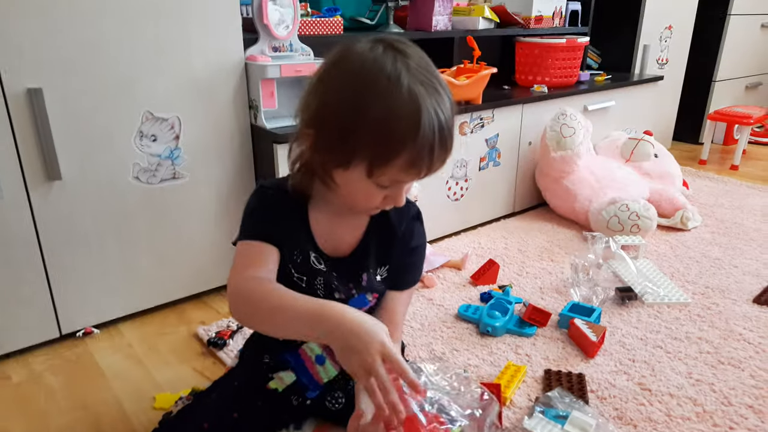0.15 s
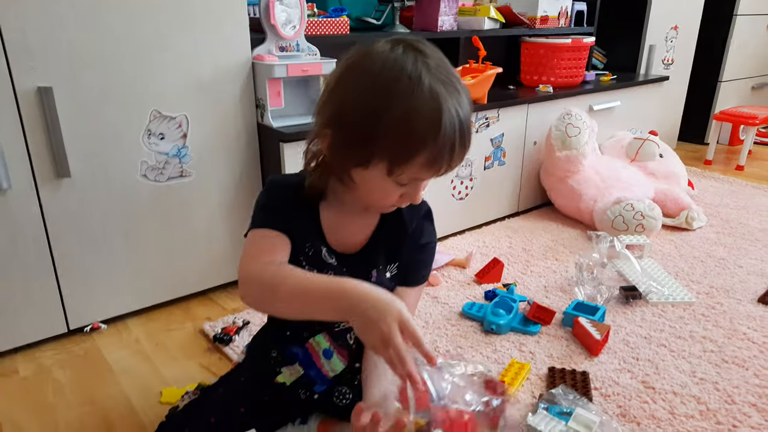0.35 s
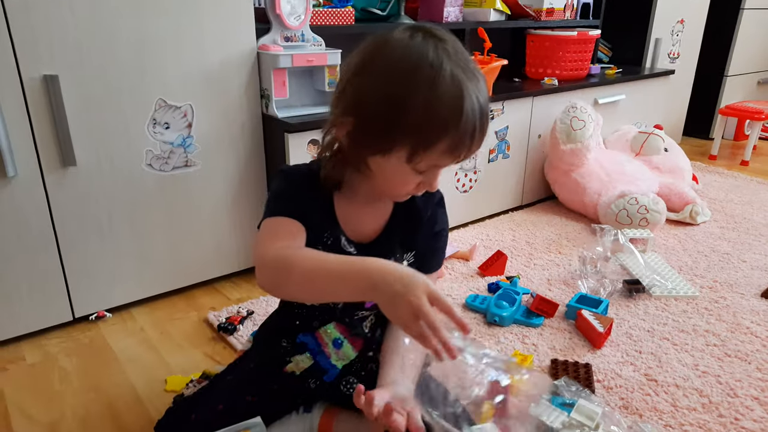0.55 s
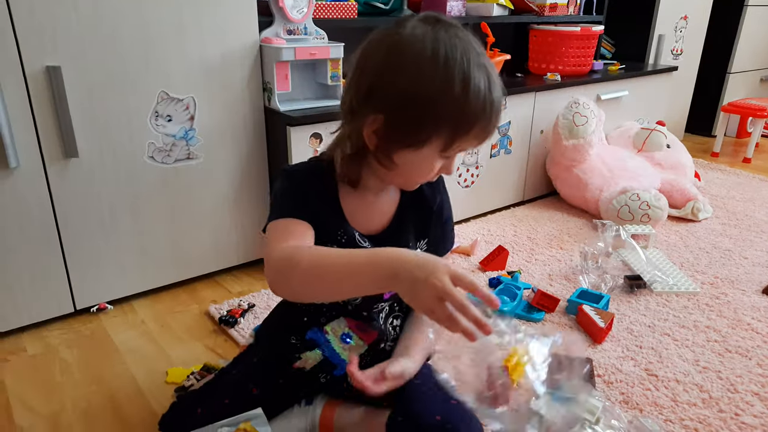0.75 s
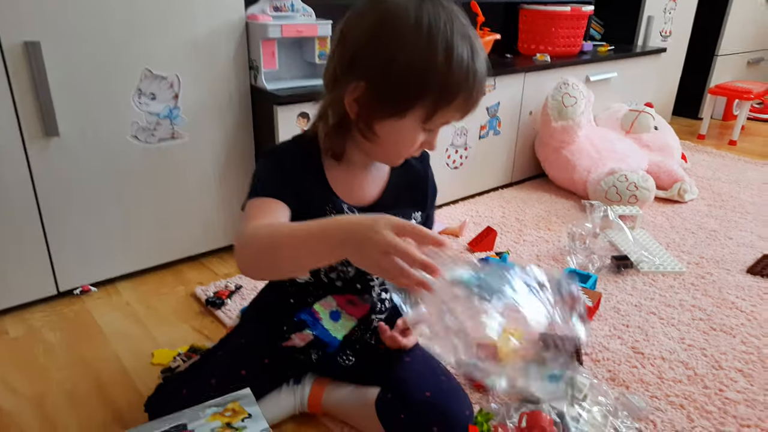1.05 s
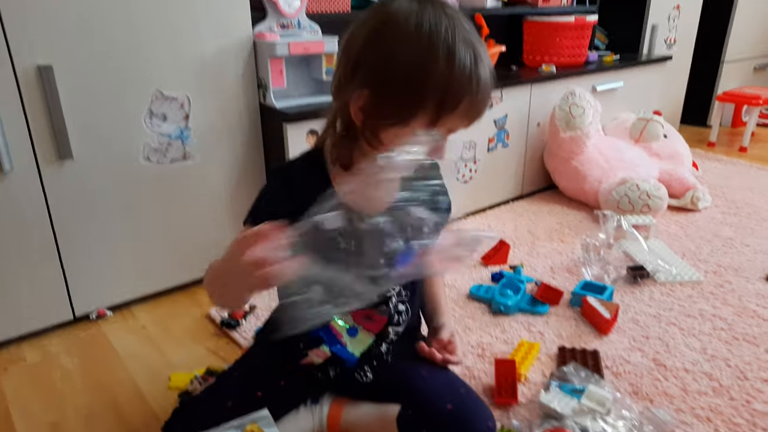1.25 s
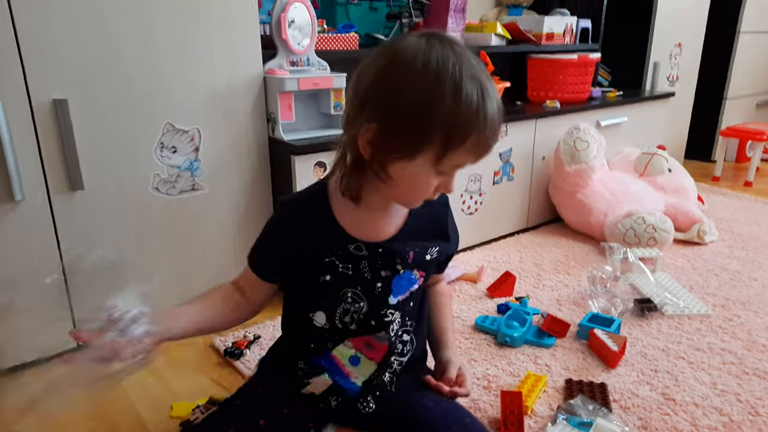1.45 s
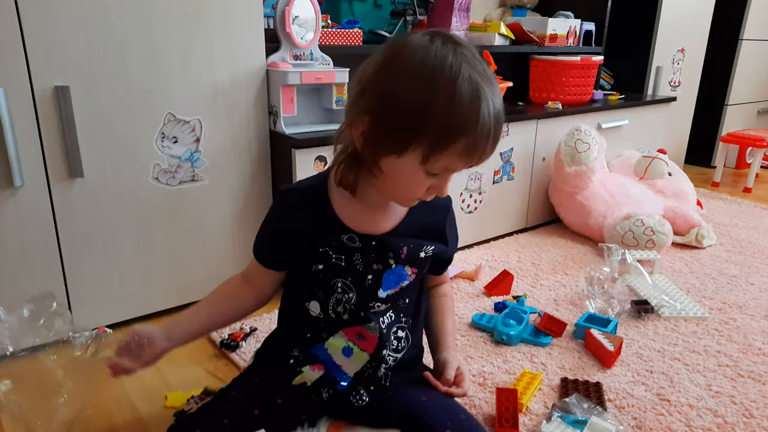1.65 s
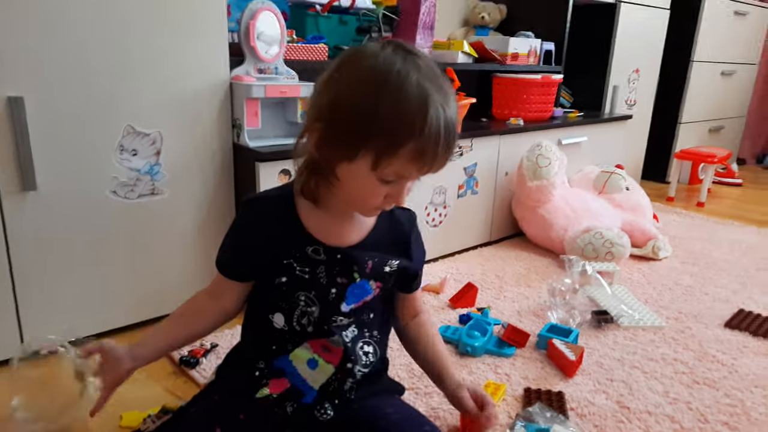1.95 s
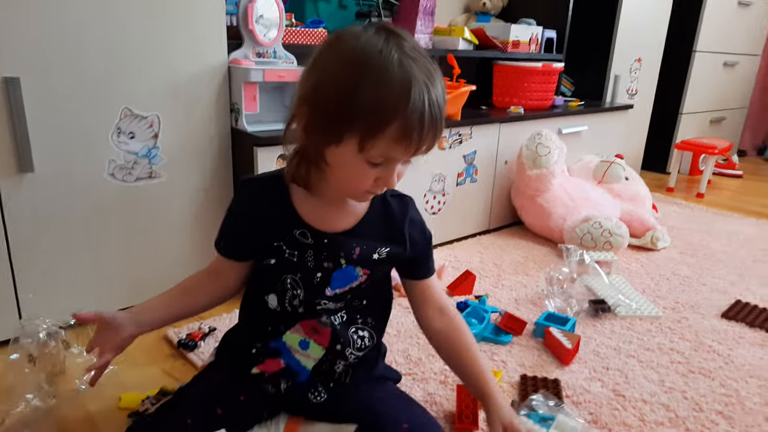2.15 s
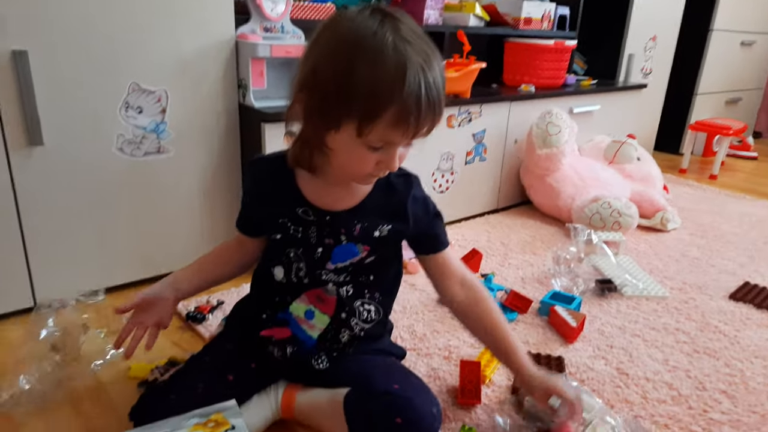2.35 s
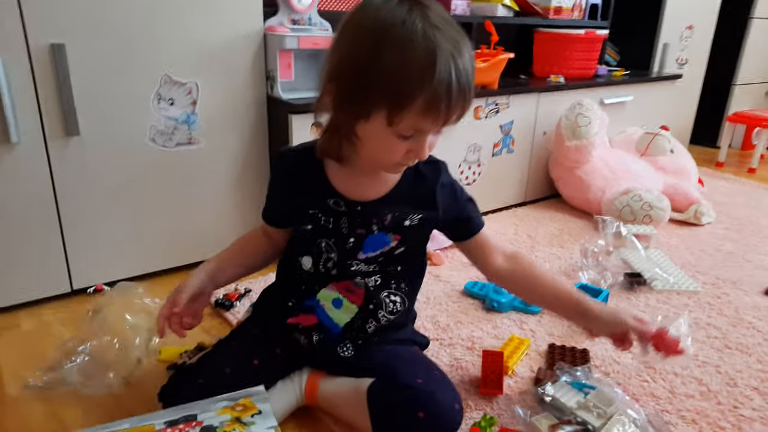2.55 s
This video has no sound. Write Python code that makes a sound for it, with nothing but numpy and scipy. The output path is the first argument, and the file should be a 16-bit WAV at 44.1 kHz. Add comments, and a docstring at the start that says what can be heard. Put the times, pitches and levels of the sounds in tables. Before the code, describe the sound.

Sharp plastic film crinkle with rattling toy bricks comes first, then a faint swish and settling of the empty bag on wood, then dry crackles and hard clicks close by in a quiet room.

```python
"""A thin plastic bag crackles, something hollow bumps, and toy bricks are shaken out onto the carpet and clack.
The empty bag is tossed aside, settles on the wooden floor farther off, then a second bag is picked at close by.
Film is bursts of coloured noise; bricks and the hollow thing are decaying sines; knocks are narrow-band noise.
The furnished room answers with a diffuse tail, and two microphones take it all over a quiet noise floor."""
import sys
import numpy as np
from scipy import signal
from scipy.fft import rfft, irfft, next_fast_len
from scipy.io import wavfile

SR = 44100
rng = np.random.default_rng(int(sys.argv[2]) if len(sys.argv) > 2 else 0)


def file_out(sig):
    """Save sig as 16-bit WAV at sys.argv[1]."""
    # one column per channel
    cols = np.atleast_2d(sig).T
    # limit, then scale
    lim = np.clip(cols, -1, 1)
    pcm = np.round(lim * 32767).astype(np.int16)
    wavfile.write(sys.argv[1], SR, pcm)


N = 119070  # 2.7 s

# Levels in the tables are those before each layer's own gain.
# Noise floor of the place. Each row: frequency in Hz, relative level in dB.
FLOOR_COLOUR = [(25, -10.5), (90, 7), (200, -16.5), (330, 8.5), (700, -17.5), (3000, -8.5), (15000, -21)]
FLOOR_DB = -72
# Decay of the furnished room. Each row: frequency in Hz, t60 in seconds.
ROOM_T60 = [(150, 0.44), (1000, 0.38), (2500, 0.29), (7000, 0.19), (15000, 0.28)]
# Colour of the room's tail. Each row: frequency in Hz, relative level in dB.
ROOM_COLOUR = [(100, 3), (400, 6.5), (1500, 3.5), (3500, 3), (8000, 5), (15000, -3)]

# Balance of the microphone pair. Each row: frequency in Hz, left minus right in dB.
MIC_BALANCE = [(200, -1.5), (600, 3.5), (1300, -2.5), (2400, -3.5), (5000, 1), (9000, 0.5), (14000, 2.5)]
# Likeness of noise at the two microphones. Each row: frequency in Hz, correlation from 0 to 1.
MIC_LIKENESS = [(60, 0.31), (300, 0.92), (800, 0.9), (1600, 0.54), (3000, 0.1), (12000, 0.018)]
MIC_LAG_S = .0001  # the left microphone hears it later
LOW_HZ, TOP_HZ = 52, 15850  # rumble filter and band limit

# Low handling rustle. Each row: time in seconds, level in dB.
HANDLING_LEVEL = [(0, -76), (.18, -97), (.22, -71), (.33, -43), (.45, -68), (.56, -49.5), (.62, -56),
                  (.67, -36.5), (.8, -67), (.86, -44.5), (.94, -51.5), (1.02, -82), (2.07, -67),
                  (2.16, -44), (2.24, -68), (2.43, -54), (2.55, -70), (2.7, -54)]
# Its colour. Each row: frequency in Hz, relative level in dB.
HANDLING_COLOUR = [(25, -30), (45, -13), (65, -2), (120, 0), (220, -2), (500, -18), (1500, -50)]
# Soft, dull knocks of things against the floor. Each row: start in seconds, level in dB, pitch in Hz.
KNOCKS = [(.921, -39.5, 621), (1.552, -56, 310), (1.556, -64, 1020), (1.58, -54, 320), (1.894, -55.5, 398),
          (1.993, -52, 578), (2.163, -38, 287), (2.287, -45, 305), (2.443, -47, 302)]
KNOCK_T60_S, KNOCK_RISE_S = 0.063, 0.0015

# Dry clicks of hard plastic. Each row: start in seconds, level in dB, treble tilt in dB per octave,
# left minus right in dB.
CLICKS = [(1.0025, -19, 17, -4), (1.8965, -37, 1, 3.5), (2.258, -14.5, 0, -3), (2.2882, -9, 1, 0),
          (2.4158, -11.5, 4.5, 0)]
# Colour of the clicks. Each row: frequency in Hz, relative level in dB.
CLICK_COLOUR = [(100, -48), (800, 2.5), (2000, 3.5), (3500, -4), (6000, -15), (8000, -1), (9800, -12.5),
                (15500, -4)]
# Pings of tiny pieces. Each row: start in seconds, level in dB, pitch in Hz, t60 in seconds.
PINGS = [(.028, -35, 4650, .03), (.089, -32, 3150, .05), (.102, -26, 2150, .035), (.1205, -22, 1480, .025),
         (.163, -29, 5650, .025), (.171, -22, 2050, .025), (.202, -23, 2200, .035), (.295, -27, 6150, .05),
         (.408, -22, 2300, .06), (.422, -15, 2650, .035), (.522, -16, 2000, .05), (.522, -20, 5200, .07),
         (.549, -18, 4020, .06), (.793, -26, 1730, .06), (.814, -18.5, 4720, .05), (1.0025, -29, 3100, .03),
         (1.136, -40, 6035, .07), (1.136, -44, 5173, .08), (1.3165, -37, 2750, .09)]

# Snaps of film: the empty bag swung away, its landing on the wooden floor, the second bag, the shaken bag.
# Each row: start in seconds, level in dB, treble tilt in dB per octave, left minus right in dB.
TOSS_SNAPS = [(1.0029, -21.5, 3, 2), (1.0148, -28, -4.5, -8), (1.0864, -28, 7.5, 2), (1.1363, -30, 6.5, 3),
              (1.3165, -31, 2.5, 6), (1.3334, -43, 1, -15), (1.365, -32.5, 2.5, 2), (1.3804, -49, 3, -10)]
LAND_SNAPS = [(1.479, -39.5, 3, 2), (1.511, -32.5, 3.5, 6), (1.5788, -33, 4, -2), (1.6242, -25.5, 4, -1.5),
              (1.731, -40.5, -2, 9.5), (1.7494, -36.5, -16, -7), (1.7748, -36.5, 8, -1.5)]
PICK_SNAPS = [(2.099, -37, -2, -1), (2.11, -21.5, 3, 0), (2.1222, -25, 3, -5), (2.1348, -19, 10, -5),
              (2.1411, -23, 0, -7), (2.152, -22, -13, 9), (2.164, -18, 0, -1), (2.1783, -16.5, 6.5, -1),
              (2.2484, -24.5, -2.5, 4), (2.304, -29, -5, 0), (2.334, -20.5, 1.5, -2.0), (2.35, -20, 1, 2),
              (2.3673, -17.5, 6.5, 3), (2.3844, -23, -5, -12), (2.419, -16.5, 1, -1),
              (2.4415, -19.5, 3, 10), (2.4467, -18, 5, -5.5), (2.4824, -25, 3.5, 1), (2.502, -28.5, -3, -3),
              (2.5468, -22.5, 5.5, -1), (2.6084, -21.5, 5.5, -3)]
SHAKE_SNAPS = [(0.0271, -23.5, -1, -3.5), (0.0884, -20, -4.5, -0.5), (0.1153, -20.5, -3, 2),
               (0.1616, -19, -0.5, 3.5), (0.1703, -28.5, -10.5, -8.5), (0.189, -20, -5, -6),
               (0.2001, -12, 1.5, 1), (0.2408, -13.5, -0.5, 0.5), (0.2562, -18, -27.5, -0.5),
               (0.2941, -9.5, 5.5, 1.5), (0.3207, -14.5, -11, -4), (0.3405, -7.5, -1.5, 1.5),
               (0.409, -17.5, -5.5, 15), (0.4218, -10.5, -4, 2), (0.4294, -6, 4.5, 2),
               (0.474, -7.5, 9, -0.5), (0.5229, -3.5, 0, -0.5), (0.5354, -17.5, 2.5, -6),
               (0.5492, -5.5, 4.5, -3), (0.5622, -7, 7.5, 5.5), (0.628, -6.5, 5.5, -1.5),
               (0.6448, -12, 3.5, 9.5), (0.6539, -8, 3, 2.5), (0.703, -13.5, 4.5, 3.5),
               (0.7386, -8.5, 4, 2.5), (0.813, -15.5, 1.5, 2), (0.855, -12.5, -1, 7),
               (0.8718, -25.5, -0.5, -10), (0.9067, -14.5, 8, 2.5), (0.926, -22.5, -2, -6),
               (0.9508, -21, 4.5, -2)]
# Fine crinkle of the swung, settling, picked and shaken bags. Each row: time in seconds, level in dB.
SWING = [(1.0, -52), (1.02, -57), (1.05, -48), (1.1, -42.5), (1.125, -50), (1.175, -46), (1.2, -61.5),
         (1.26, -63.5), (1.305, -62), (1.32, -48.5), (1.38, -45), (1.41, -83)]
SETTLE = [(1.49, -68.5), (1.52, -46.5), (1.56, -87), (1.64, -60), (1.72, -68), (1.735, -46), (1.78, -48.5),
          (1.81, -67), (1.98, -81.5), (1.995, -47.5), (2.03, -48), (2.08, -61)]
PICK = [(2.092, -45.5), (2.11, -41), (2.16, -31), (2.2, -39.5), (2.24, -49), (2.3, -40.5), (2.33, -57),
        (2.37, -39), (2.4, -43), (2.44, -38.5), (2.49, -45.5), (2.53, -80), (2.6, -63), (2.63, -50.5),
        (2.69, -54)]
SHAKE = [(0.0, -36.5), (0.024, -42.5), (0.366, -25.5), (0.394, -25.5), (0.426, -16), (0.504, -26),
         (0.554, -18), (0.606, -31.5), (0.652, -20), (0.68, -31.5), (0.724, -20.5), (0.75, -26.5),
         (0.842, -39.5), (0.854, -22.5), (0.966, -69.5), (0.99, -67.5)]
# Colours of the film: swung bag, landed bag, second bag, crinkle of the full bag, snaps of the full bag.
# Each row: frequency in Hz, relative level in dB.
EMPTY_BAG = [(150, -59), (450, -29), (800, -15), (1400, 1), (2200, 6.5), (3300, -0.5), (5900, -6),
             (10000, -17.5), (15500, -25.5)]
LANDED_BAG = [(40, -20.5), (100, -11), (190, -31), (330, -7.5), (560, -4), (900, -7), (1600, -1.5),
              (3000, -4.5), (6000, -7), (10000, -15), (15500, -13.5)]
SECOND_BAG = [(30, -50), (150, -9.5), (230, -16.5), (290, -7), (480, -20.5), (780, -2), (1000, -16),
              (1350, -4), (2000, -3.5), (3000, -9), (5000, -11.5), (8200, -12.5), (10000, -20.5),
              (13000, -12.5), (15500, -27)]
FULL_BAG = [(60, -51.5), (250, -27), (333, -6), (480, -36.5), (800, -11.5), (1300, -11), (2200, 0.5),
            (2700, -9), (3900, 0), (6600, -10.5), (9000, -18), (12000, -12.5), (15500, -12.5)]
FULL_SNAP = [(30, -38), (130, -27.5), (400, -7.5), (900, -0.5), (1600, 5.5), (3000, 3.5), (5500, 5),
             (8500, 1), (12000, 0), (15500, -2.5)]
POP_T60_S, SCUFF_T60_S = .006, .011  # fade of one crinkle pop: full or picked bag, empty bag
RISE_SHARE = 0.067  # a snap's rise time constant over its t60

# Hollow bumps under the bag. Each row: start in seconds, level in dB.
BUMPS = [(0.201, -34.5), (0.244, -28.5), (0.282, -38), (0.323, -24.5), (.379, -25), (0.424, -25.5),
         (.468, -31.5), (0.494, -38), (.522, -30.5)]
# Resonances of the hollow thing. Each row: frequency in Hz, level in dB, t60 in seconds.
BUMP_MODES = [(296, -3.5, .2), (339, 0, .16), (385, -10, .06), (547, -14, .05), (755, -13, .05),
              (854, -13, .05), (1254, -12, .06)]
# Blows on a large brick. Each row: start in seconds, level in dB.
LARGE_BRICK_HITS = [(.523, -19), (.548, -9.5), (.629, -27)]
# Resonances of the large brick. Each row: frequency in Hz, level in dB, t60 in seconds.
LARGE_BRICK_MODES = [(1382, 2.5, .14), (1560, -12, .04), (1730, -11, .05), (1948, -6, .05), (1989, -6, .06),
                     (2110, -7, .1), (2191, -8, .42), (2222, -6, .12), (2356, -11, .06), (3562, -11, .12),
                     (3989, -8, .07), (4368, -13, .05), (5200, -14, .2)]
# Small bricks of several sizes clacking. Each row: start in seconds, level in dB, pitch ratio,
# ring length ratio.
BRICK_HITS = [(.430, -17.5, .72, 1), (.327, -31, 0.24, 1.3), (.6942, -12.5, 1.02, 0.41),
              (.704, -14, 1, 1.6), (.7195, -13.5, 1.06, 1), (.724, -12, 0.98, 1.3)]
# Resonances of small bricks at ratio 1. Each row: frequency in Hz, level in dB, t60 in seconds.
BRICK_MODES = [(2170, -5, .05), (2298, -5, .05), (2488, -9, .03), (2955, -1, .03), (3028, -3, .07),
               (3165, -1, .035), (3410, -1, .03), (3750, -3, .02), (4036, -3, .03)]
# Resonances of a jostled brick of middle size. Each row: frequency in Hz, level in dB, t60 in seconds.
TICK_MODES = [(2200, 6, .035), (3500, 1, .03), (5600, -1, .025)]
JOSTLE_PER_S, JOSTLE_DB, JOSTLE_OCTAVES = 100, -7, .5  # tick rate, level over SHAKE, pitch scatter


def amp(db):
    """Decibels to gain."""
    return 10 ** (np.asarray(db) / 20)


def unit(x):
    """Scale to rms 1."""
    return x / np.sqrt(np.mean(x ** 2) + 1e-20)


def along(points, hz):
    """(Hz, value) points read on a log frequency axis."""
    f, v = np.transpose(points)
    return np.interp(np.log(hz + 1), np.log(f + 1), v)


def level(rows):
    """Gain per sample from (s, dB) rows, -120 dB outside them."""
    s, db = np.transpose(rows)
    return amp(np.interp(np.arange(N) / SR, s, db, left=-120, right=-120))


def add(track, s, sound):
    """Mix a stereo sound into the track at time s."""
    start = max(0, round(s * SR))
    part = sound[:, :max(0, N - start)]
    track[:, start:start + part.shape[1]] += part


def noise(colour, size, tilt_db=0, ripple_db=0):
    """Stereo noise of rms 1 with a treble tilt and random resonances, as alike left and right as MIC_LIKENESS."""
    hz = np.fft.rfftfreq(size, 1 / SR)
    knots = np.geomspace(200, 16000, num=64)
    ripple = np.interp(hz, knots, rng.standard_normal(len(knots)))
    octaves = np.log2(np.maximum(hz, 1500) / 4000)  # the tilt stays level below 1500 Hz
    gain = amp(along(colour, hz) + tilt_db * octaves + ripple_db * ripple)
    # the share of mid and side sets the correlation
    turn = np.arccos(np.clip(along(MIC_LIKENESS, hz), -1, 1)) / 2
    spectra = rfft(rng.standard_normal((2, size))) * gain
    mid, side = irfft(spectra * [np.cos(turn), np.sin(turn)], size)
    return unit(np.array([mid + side, mid - side]))


def snap(colour, tilt_db, t60, flutter_db, flutter_t60, ripple_db):
    """A crease buckles in a short noise burst, then the film around it flutters out in a slower fade."""
    burst = noise(colour, size=4096, tilt_db=tilt_db, ripple_db=ripple_db)
    t = np.arange(burst.shape[1]) / SR
    rise = 1 - np.exp(-t / (RISE_SHARE * t60))
    fade = (amp(-60 * t / t60) + amp(flutter_db - 60 * t / flutter_t60)) * rise
    return unit(burst * fade) * np.sqrt(np.mean(fade ** 2))  # rms of the fade itself


def snaps(rows, colour, gain_db, t60, flutter_db, flutter_t60, ripple_db):
    """Single snaps, each a fresh burst with its own tilt and place between the microphones."""
    out = np.zeros((2, N))
    for s, db, tilt, pan in rows:
        sides = amp(db + gain_db + np.array([[pan], [-pan]]) / 2)
        add(out, s, sides * snap(colour, tilt, t60, flutter_db, flutter_t60, ripple_db))
    return out


def crinkle(curve, colour, gain_db, per_s, scatter_db, t60, count=24):
    """Many creases, each with its own tone, pop at random with scattered strength."""
    out = np.zeros((2, N))
    for _ in range(count):
        strength = amp(scatter_db * np.clip(rng.standard_normal(N), -2, 1.5))
        pops = (rng.random(N) < per_s / count / SR) * strength
        tilt = 1.5 * rng.standard_normal()
        tone = snap(colour, tilt, t60, flutter_db=-18, flutter_t60=.03, ripple_db=4.5)
        out += signal.oaconvolve(pops[None], tone, axes=1)[:, :N]
    return amp(gain_db) * level(curve) * unit(out)


def ringing(hits, modes, attack_s, spread):
    """Each blow rings decaying sines anew; they reach the two microphones in differing phase."""
    out = np.zeros((2, N))
    t = np.arange(SR // 3) / SR
    for s, db, ratio, length in hits:
        ring = 0
        for hz, mode_db, t60 in modes:
            fade = amp(mode_db + .5 * rng.standard_normal() - 60 * t / (t60 * length))
            phase = spread * rng.standard_normal((2, 1))  # radians
            ring = ring + fade * np.sin(2 * np.pi * hz * ratio * t + phase)
        add(out, s, amp(db) * ring * (1 - np.exp(-t / attack_s)))
    return out


def same_size(rows):
    """Give (s, dB) blows a pitch ratio and ring length ratio of 1."""
    return [(s, db, 1, 1) for s, db in rows]


def room(x, wet_db):
    """The dry sound plus the diffuse answer of cupboards and walls: noise fading at each pitch's own rate."""
    hz, _, z = signal.stft(noise(ROOM_COLOUR, size=SR // 2), SR, nperseg=256)
    t = np.arange(z.shape[2]) * 128 / SR  # frames half overlap
    fade = amp(-60 * t / along(ROOM_T60, hz)[:, None])
    tail = signal.istft(z * fade, SR, nperseg=256)[1]
    build_up_s = 0.0088
    tail = tail * (1 - np.exp(-(np.arange(tail.shape[1]) / SR / build_up_s) ** 2))
    tail = tail / np.linalg.norm(tail[0])
    return x + amp(wet_db) * signal.fftconvolve(x, tail, axes=1)[:, :N]


def noise_floor():
    """The quiet room: steady coloured noise."""
    return amp(FLOOR_DB) * noise(FLOOR_COLOUR, size=N)


def handling():
    """Soft handling thuds: low noise that swells and sinks."""
    return amp(-6) * level(HANDLING_LEVEL) * noise(HANDLING_COLOUR, size=N)


def knocks():
    """Dull knocks on the floor: short noise in a narrow band around each pitch."""
    out = np.zeros((2, N))
    t = np.arange(SR // 4) / SR
    for s, db, hz in KNOCKS:
        band = [(hz / 2, -36), (hz / 0.91, -6), (hz, 0), (hz * 1.05, -6), (hz * 2, -36), (hz * 10, -80)]
        body = noise(band, size=len(t))
        add(out, s, amp(db - 60 * t / KNOCK_T60_S) * (1 - np.exp(-t / KNOCK_RISE_S)) * body)
    return room(out, wet_db=-8.0)


def clicks():
    """Hard plastic edges meet and stop dead: very short noise bursts."""
    dry_clicks = snaps(CLICKS, CLICK_COLOUR, gain_db=1, t60=0.0061, flutter_db=-16.5,
                       flutter_t60=0.042, ripple_db=0.5)
    return room(dry_clicks, wet_db=-10)


def pings():
    """Tiny pieces bounce free, each ringing with one clear tone."""
    out = np.zeros((2, N))
    for s, db, hz, t60 in PINGS:
        out += ringing([(s, db, 1, 1)], [(hz, 0, t60)], attack_s=.0003, spread=.5)
    return room(out, wet_db=-17)


def tossed_bag():
    """The empty bag is swung away, lands farther off with more room on it and slowly uncrumples."""
    swing = snaps(TOSS_SNAPS, EMPTY_BAG, gain_db=-6, t60=0.0072, flutter_db=1,
                  flutter_t60=0.068, ripple_db=6.5)
    swing += crinkle(SWING, EMPTY_BAG, gain_db=-1, per_s=700, scatter_db=3, t60=SCUFF_T60_S)
    landing = snaps(LAND_SNAPS, LANDED_BAG, gain_db=-3.5, t60=0.019, flutter_db=-14,
                    flutter_t60=0.066, ripple_db=-4.5)
    landing += crinkle(SETTLE, LANDED_BAG, gain_db=-3, per_s=2500, scatter_db=3, t60=SCUFF_T60_S)
    return room(swing, wet_db=-12.5) + room(landing, wet_db=-8.5)


def second_bag():
    """Fingers pick at a bag close by: short, dry snaps over fine crinkle."""
    film = snaps(PICK_SNAPS, SECOND_BAG, gain_db=-4.0, t60=0.01, flutter_db=-11.0,
                 flutter_t60=0.045, ripple_db=2.0)
    film += crinkle(PICK, SECOND_BAG, gain_db=-0.5, per_s=660, scatter_db=3.5, t60=POP_T60_S)
    return room(film, wet_db=-10.0)


def hollow_bumps():
    """Something hollow under the bag is bumped and rings low."""
    return ringing(same_size(BUMPS), BUMP_MODES, attack_s=0.0028, spread=0.061)


def large_brick():
    """A large brick is struck and rings."""
    return amp(-3) * ringing(same_size(LARGE_BRICK_HITS), LARGE_BRICK_MODES, attack_s=.0007, spread=.3)


def small_bricks():
    """Small bricks clack together; the pitch ratio stands for their size."""
    return amp(-2.5) * ringing(BRICK_HITS, BRICK_MODES, attack_s=0.00011, spread=1.0)


def jostle():
    """Bricks of all sizes tick against each other inside the bag, as hard as it is shaken."""
    s, db = np.transpose(SHAKE)
    times = np.arange(s[0], s[-1], 1 / JOSTLE_PER_S)
    late, strength, size = rng.standard_normal((len(times), 3)).T
    times = np.abs(times + .5 * late / JOSTLE_PER_S)  # uneven, never before the start
    levels = np.interp(times, s, db) + JOSTLE_DB + 2 * strength
    ratios = 2 ** (JOSTLE_OCTAVES * size)
    hits = zip(times, levels, ratios, np.ones(len(times)))
    return ringing(hits, TICK_MODES, attack_s=0.00027, spread=0.26)


def shaken_film():
    """Film of the full bag: loud snaps that flutter out, over dense crinkle."""
    film = snaps(SHAKE_SNAPS, FULL_SNAP, gain_db=-5.5, t60=0.011, flutter_db=-7.0,
                 flutter_t60=0.12, ripple_db=3.5)
    return film + crinkle(SHAKE, FULL_BAG, gain_db=-2.0, per_s=600, scatter_db=5.0, t60=POP_T60_S)


def shaken_bag():
    """The full bag crackles and bumps while bricks tumble out; large brick and bumps stand drier in the room."""
    near = room(large_brick() + hollow_bumps(), wet_db=-18)
    return room(shaken_film() + small_bricks() + jostle(), wet_db=-9.0) + near


def scene():
    """Bags and bricks over soft handling thuds and the quiet room."""
    background = noise_floor() + handling() + knocks()
    plastic = clicks() + pings()
    return background + plastic + tossed_bag() + second_bag() + shaken_bag()


def record(dry):
    """Two microphones of slightly different colour and place, a rumble filter and the band limit."""
    size = next_fast_len(N + SR // 2)
    hz = np.fft.rfftfreq(size, 1 / SR)
    colour = amp(along(MIC_BALANCE, hz) * np.array([[.5], [-.5]]))
    # half the lag delays the left, half advances the right
    lag = np.exp(np.pi * 1j * hz * MIC_LAG_S * np.array([[-1], [1]]))
    low_cut = hz ** 2 / np.sqrt(hz ** 4 + LOW_HZ ** 4)
    top_cut = 1 / np.sqrt(1 + (hz / TOP_HZ) ** 260)
    return irfft(rfft(dry, size) * colour * lag * low_cut * top_cut, size)[:, :N]


dry = scene()
out = record(dry)
file_out(out)
```